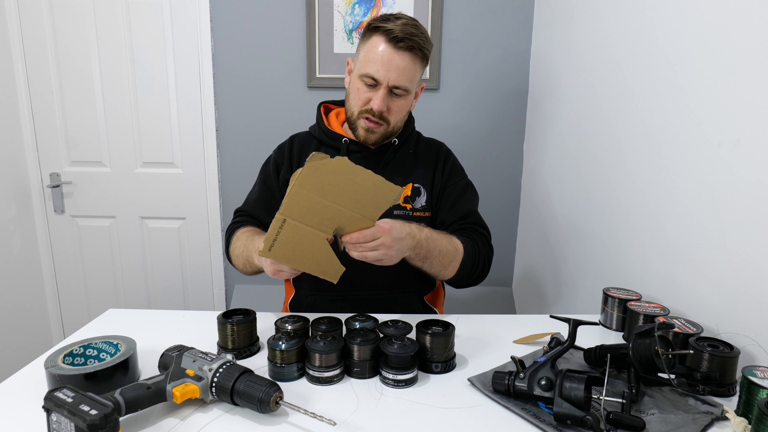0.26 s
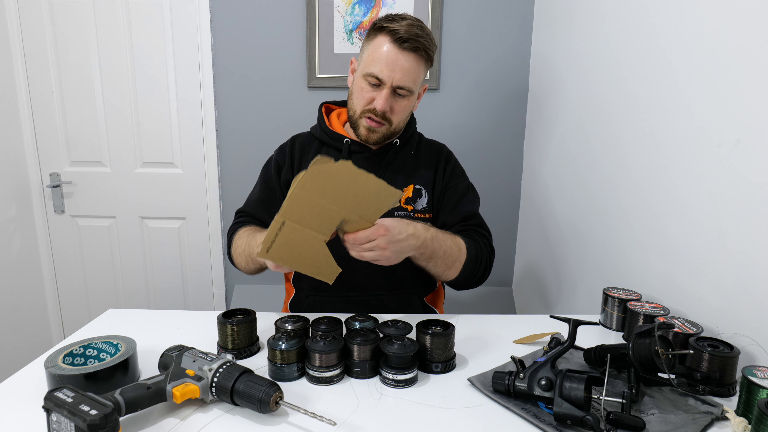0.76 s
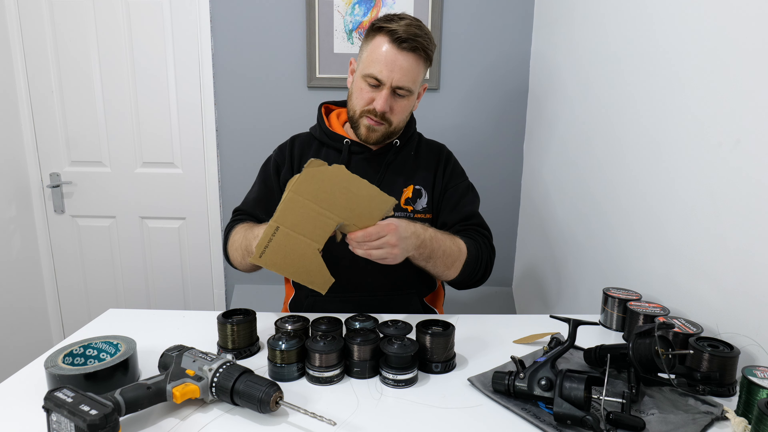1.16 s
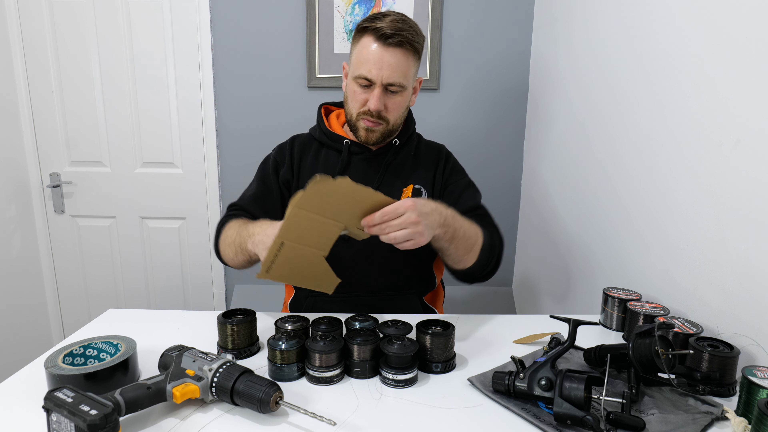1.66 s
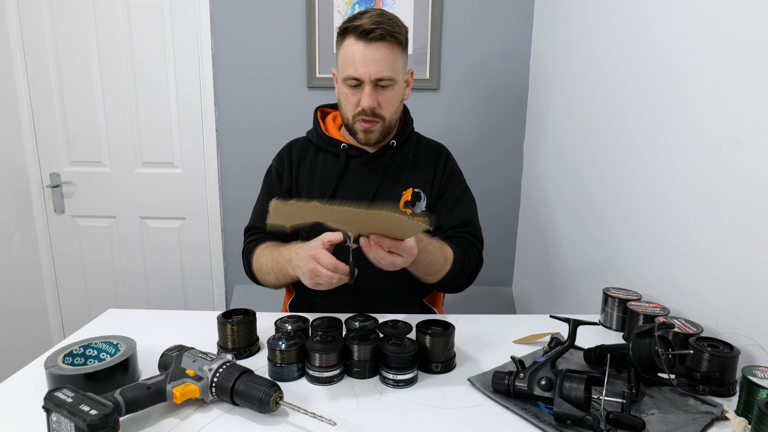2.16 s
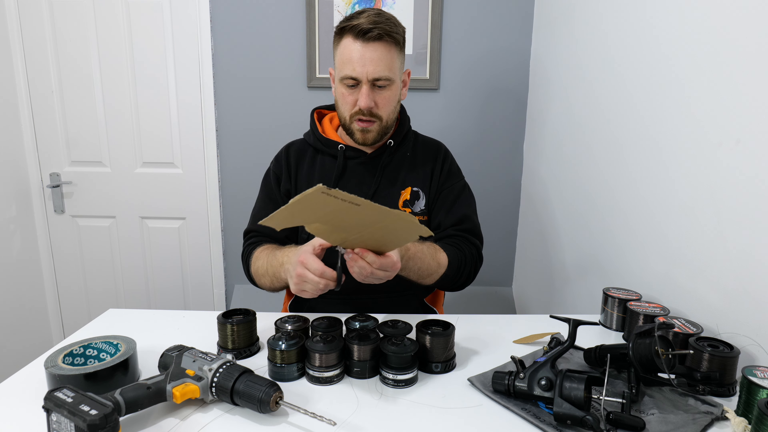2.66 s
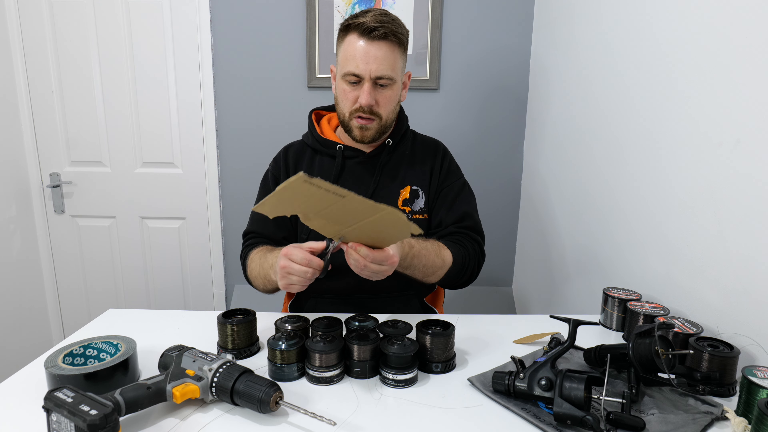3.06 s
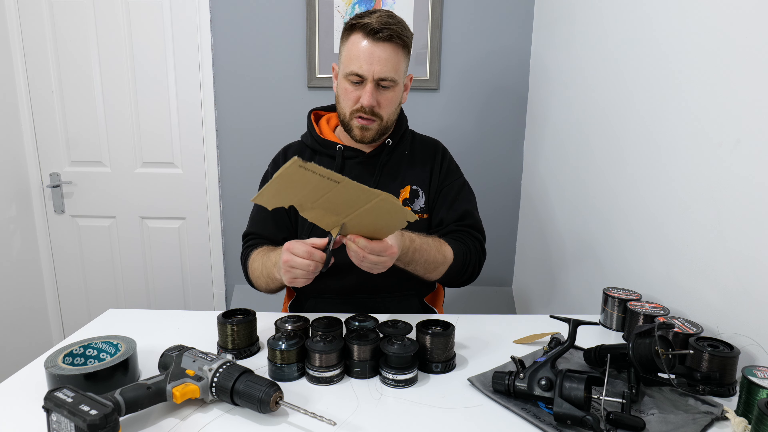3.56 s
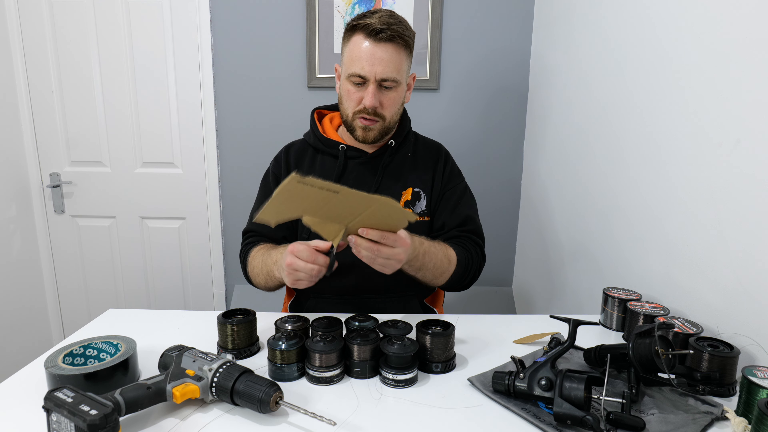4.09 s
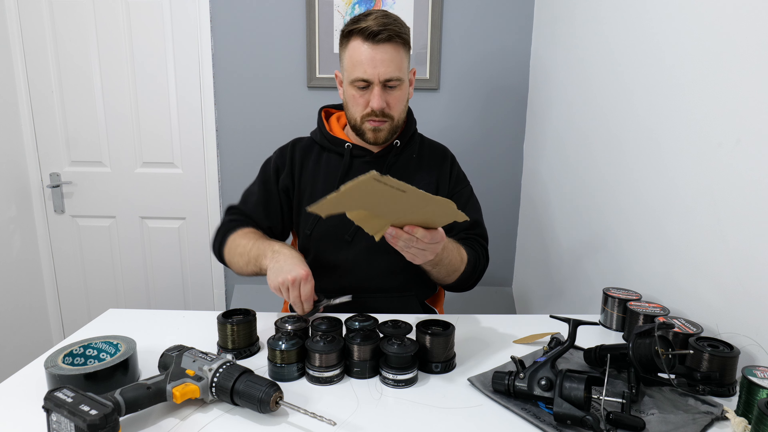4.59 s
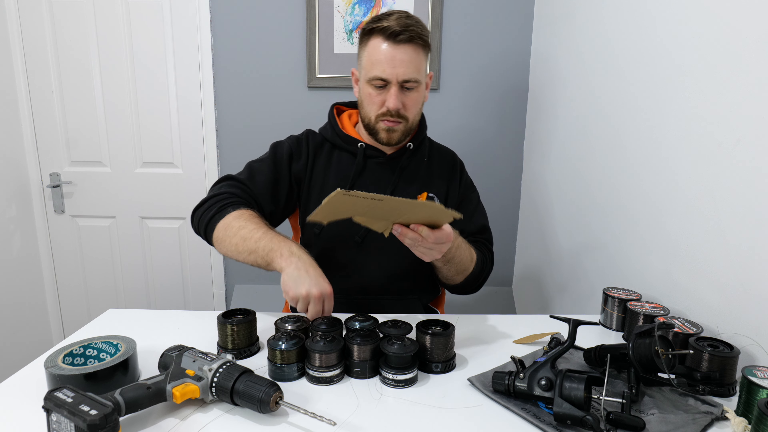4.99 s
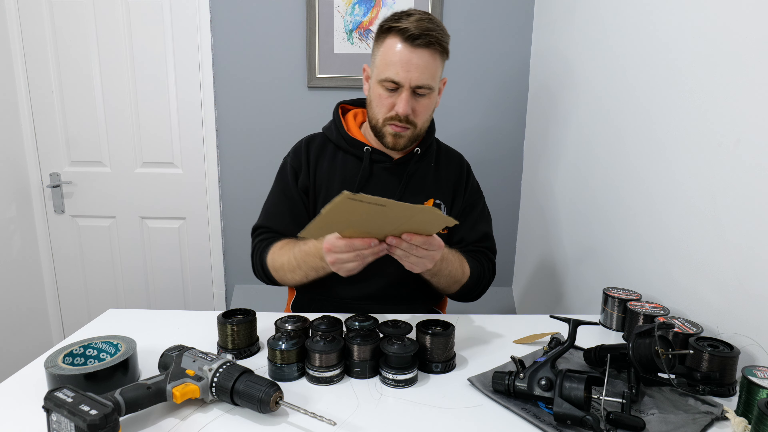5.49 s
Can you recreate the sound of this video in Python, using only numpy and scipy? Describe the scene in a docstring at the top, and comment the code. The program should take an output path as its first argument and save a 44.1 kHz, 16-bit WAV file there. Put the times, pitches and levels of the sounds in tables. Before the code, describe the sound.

Scissors crunch irregularly through stiff corrugated cardboard that rubs and crackles in the hands, then clatter onto a table in a small room.

```python
"""A dry crunch and a papery rub come first: scissors bite through corrugated card held in the hands. Each bite
is a burst of breaking fibres, a bright crunch that also rings and booms the sheet. In between, a changing
rubbing hiss and hum sounds through the same resonances. Near the end the scissors clatter onto the table, which
knocks and thumps while the steel rattles; then a few last bites follow. A small bare room answers all of it,
over a faint room tone."""
import sys
import numpy as np
from scipy import signal
from scipy.fft import rfft, irfft
from scipy.io import wavfile

SR = 44100
rng = np.random.default_rng(int(sys.argv[2]) if len(sys.argv) > 2 else 0)


def unload_wav(signal):
    """Save mono or channel-first audio to the path in sys.argv[1] as 16-bit WAV at rate SR, clipped to [-1, 1]."""
    wavfile.write(
        sys.argv[1],
        SR,
        np.round(np.clip(np.atleast_2d(signal).T, -1, 1) * 32767).astype(np.int16),
    )


N = 252957

# All table levels are relative: each layer is trimmed again where it is mixed.
# Spectrum of the room tone: pitch_hz [Hz], level_db [dB]
ROOM_TONE = [(18, -71), (30, -31), (103, -5.5), (238, -17), (372, -0.5), (735, -7.5), (1420, -7.5),
             (3450, -15.5), (10900, -15.5), (14200, -20), (15800, -39)]
# Time the reverberation takes to fall 60 dB: pitch_hz [Hz], t60_s [s]
REVERB_T60 = [(150, 0.4), (500, 0.4), (1500, 0.27), (4000, 0.39), (10000, 0.27), (15000, 0.18)]
# Width of the reverberation, side against mid: pitch_hz [Hz], side_db [dB]
REVERB_SIDE = [(60, -11), (110, -25), (200, -21), (380, -28.5), (700, -17.5), (1290, -14.5), (2380, -15),
               (4400, -10), (8120, -21.5), (15000, -7)]

# Scissors touching the table: start_s [s], knock_db [dB], knock_hz [Hz, favoured], thump_db [dB],
# steel_db [dB], steel_hz [Hz, favoured], fade_t60_s [s]
TABLE_CONTACTS = [(4.55, -45, 2050, -38.5, -52, 4340, .12), (4.761, -33, 1640, -47.5, -33, 5510, 0.038),
                  (4.837, -31, 1760, -64, -42, 6150, .071), (4.909, -45, 1710, -73, -42.5, 6050, .033),
                  (4.975, -31.5, 1250, -47.5, -45, 5530, 0.36),
                  (5.02, -11.5, 1920, -33.5, -51, 4470, 0.0077),
                  (5.036, -21.5, 1950, -42.5, -48, 4470, 0.16), (5.095, -24.5, 724, -51, -34.5, 5900, .044),
                  (5.145, -1, 2600, -28, -47, 4560, 0.007), (5.159, -9.5, 980, -59, -44, 4500, 0.026),
                  (5.191, -17.5, 1010, -31.5, -23, 8100, 0.048),
                  (5.209, -16, 920, -27.5, -30.5, 7900, 0.056), (5.25, -15.5, 1200, -44, -41, 8210, 0.058),
                  (5.289, -23.5, 1280, -34, -43, 8130, 0.07)]
# Resonances of the table top with handles lying on it: pitch_hz [Hz], width_hz [Hz], level_db [dB]
TABLE_KNOCK_MODES = [(733, 200, 4), (890, 110, 0), (990, 64, -3), (1094, 48, 0.5), (1370, 160, 3.5),
                     (1528, 43, -1.5), (1570, 220, 2.5), (1890, 140, -12), (1986, 230, 3), (2536, 100, -4),
                     (2570, 240, -2), (3100, 250, -7.5), (3600, 300, -8.5), (4400, 300, -2)]
# Low resonances of the table: pitch_hz [Hz], width_hz [Hz], level_db [dB]
TABLE_THUMP_MODES = [(135, 31, 0.5), (165.4, 32, 1.5), (197, 69, -6), (321, 44, 1.5), (368, 120, -0.5),
                     (560, 60, 4.5)]
# Steel damped by hand and table: pitch_hz [Hz], width_hz [Hz], level_db [dB]
DAMPED_BLADE_MODES = [(5440, 370, -16), (5360, 1700, 4), (6800, 750, -16), (8400, 830, -3),
                      (11200, 1500, -6.5), (12500, 1500, -21)]
# Blades ringing freely: pitch_hz [Hz], width_hz [Hz], level_db [dB]
FREE_BLADE_MODES = [(7950, 90, -7), (8340, 70, -2), (8730, 200, -10), (12400, 87, -7), (12430, 80, -12)]

# Bites and snaps of the card: start_s [s], ring_db [dB], ring_hz [Hz, favoured], boom_db [dB],
# crunch_db [dB], snap_db [dB over the burst], fade_t60_s [s]
CARD_BITES = [(0.0301, -30, 2020, -35, -39, -6, 0.28), (0.0701, -28, 1310, -27.5, -36, 26, 0.077),
              (0.185, -29.5, 1220, -35, -52, 18.5, .078), (0.2178, -29.5, 1720, -36.5, -33, 19, 0.16),
              (0.2663, -32, 1470, -27, -37, 19, 0.12), (0.2903, -25.5, 1200, -57, -25.5, 14, 0.28),
              (0.3539, -18, 1940, -24.5, -34, 23, .09), (0.5247, -16.5, 1670, -23, -22, 10.5, 0.026),
              (0.5462, -15, 1180, -30, -39, 19.5, 0.074), (0.613, -27.5, 1980, -42, -36.5, 19, 0.14),
              (0.6977, -23, 1190, -38, -49, 16, 0.24), (0.7381, -21, 1800, -34.5, -29, 19, 0.21),
              (0.7853, -17, 1160, -27.5, -32.5, 22.5, 0.063), (0.821, -24.5, 1570, -39.5, -36, 23, 0.44),
              (0.8934, -17, 1480, -26, -23, 21.5, 0.083), (1.056, -22, 1340, -22, -23.5, 15.5, 0.053),
              (1.1075, -48, 1960, -35, -42, 23.5, 0.2), (1.3666, -45, 1720, -57, -43.5, 23, 0.5),
              (1.4455, -15, 1450, -27, -28, 19.5, 0.17), (1.4862, -23, 1320, -25, -25.5, 18.5, 0.11),
              (1.6642, -30, 1220, -41, -34, 6, 0.046), (1.7921, -24.5, 1330, -27.5, -35, 9.5, 0.033),
              (1.8414, -19.5, 1220, -31, -32.5, 20, .2), (1.8754, -29, 1620, -42, -34, 19, 0.29),
              (2.037, -42, 1390, -38, -37.5, 16.5, 0.028), (2.167, -27.5, 1230, -44.5, -35.5, 12, 0.13),
              (2.2865, -35, 1320, -60, -43, 9, 0.045), (2.3188, -32.5, 1430, -61, -58, 3, 0.094),
              (2.4004, -39.5, 1580, -61, -42.5, 19, .31), (2.6396, -25.5, 1700, -37.5, -35.5, 15, 0.089),
              (2.748, -31.5, 1630, -49.5, -35, 12, 0.093), (2.865, -42, 1400, -53, -39.5, 6, 0.079),
              (2.9178, -33.5, 1250, -53, -38.5, 15, 0.039), (3.0611, -12.5, 2250, -37, -25, 14, 0.033),
              (3.0859, -25, 1830, -40, -25, 28.5, 0.23), (3.269, -30, 1410, -45, -25.5, 6, 0.24),
              (3.4024, -65, 1750, -63, -42, 12, 0.2), (3.45, -36, 1460, -47, -34.5, 24, 0.13),
              (3.481, -18.5, 1877, -33.5, -22.5, 19.5, .25), (3.658, -37, 1250, -60, -30.5, 7, 0.2),
              (3.6974, -29, 2380, -63.5, -44, 22.5, 0.077), (3.7848, -35, 2400, -53, -33.5, 15, 0.14),
              (3.82, -24.5, 1500, -41, -26.5, 19, 0.04), (3.8535, -17.5, 1830, -26, -16.5, 19.5, .12),
              (4.118, -31, 1840, -53, -42, 10, 0.029), (4.3714, -37, 1350, -74, -34.5, 24, 0.082),
              (5.4595, -24.5, 1250, -34, -24.5, 25.5, 0.054), (5.4899, -25.5, 2000, -38, -26, 21, 0.091),
              (5.6367, -12, 1340, -20.5, -17, 19, 0.093)]
# Rubbing hiss and hum, played through the sheet's resonances; near 5 s it is the scissors scraping the table:
# start_s [s], hiss_db [dB], ring_db [dB]
RUBBING = [(0.0, -41, -37.5), (0.19, -64, -45.5), (0.33, -53, -51), (0.49, -54, -40.5), (0.7, -36, -29.5),
           (0.97, -53, -46), (1.09, -39, -28), (1.23, -48.5, -45), (1.48, -71, -62), (1.63, -53.5, -39.5),
           (1.85, -43.5, -41), (2.19, -60, -60.5), (2.32, -40, -34), (2.44, -74, -60), (2.99, -64, -73),
           (3.29, -73, -48.5), (4.05, -52, -47.5), (4.23, -38.5, -34.5), (4.33, -47.5, -49),
           (4.44, -88, -96), (4.6, -78, -92), (4.81, -51, -40), (4.95, -69, -56), (5.06, -55, -35),
           (5.24, -61, -35), (5.37, -50, -41), (5.74, -50, -56)]
# Pitches favoured by how the sheet is held: start_s [s], boom_hz [Hz], rubbed_ring_hz [Hz]
SHEET_GRIP = [(0, 546, 1380), (0.45, 570, 1490), (0.7, 700, 1720), (0.74, 330, 1690), (0.78, 670, 1650),
              (0.9, 554, 1470), (1.05, 440, 1460), (1.5, 547, 1450), (1.8, 350, 1320), (1.85, 670, 1350),
              (2.04, 377, 1450), (2.4, 420, 1710), (3.825, 404, 2220), (3.855, 730, 2230),
              (3.98, 424, 2180), (4.2, 448, 1800), (5.06, 420, 1930), (5.46, 420, 1300), (5.64, 706, 1390)]
# Low resonances of the sheet: pitch_hz [Hz], width_hz [Hz], level_db [dB]
SHEET_BOOM_MODES = [(141.5, 12, -2.5), (203, 450, -15.5), (313, 62, -1.5), (383.6, 25, 0), (445.3, 25, -3),
                    (593, 69, 1.5), (693, 110, -9), (821, 20, 0)]
# Upper resonances of the sheet: pitch_hz [Hz], width_hz [Hz], level_db [dB]
SHEET_RING_MODES = [(964, 105, -6), (1183, 55, -0.5), (1276, 390, -0.5), (1443, 120, -0.5),
                    (1546, 250, -12.5), (1700, 79, -1), (1848, 106, -1), (1934, 630, -4), (2310, 146, 0),
                    (2640, 79, -7.5), (3320, 120, -7), (3180, 660, -6), (4020, 250, -10), (4800, 150, -15)]
# Broad bands in which breaking fibres crunch: pitch_hz [Hz], width_hz [Hz], level_db [dB]
CRUNCH_BANDS = [(2160, 1140, 4), (3200, 610, -2), (4170, 1440, 1), (5700, 1840, -1), (7650, 1400, 0),
                (9260, 1200, 0), (11750, 4400, 4.5), (14500, 2600, -6)]

ROOM_TONE_DB = -64   # level of the part shared by left and right
REVERB_DB, WALL_S, WALL_DB = 2.5, 0.01, -11.5   # diffuse tail and one near wall, against the direct sound
POSE_S = 0.14   # spacing of the hands' places in the room
SNAP_SPREAD_S = 0.002   # longest random delay of a snap
CLUMPS_PER_S, CLUMP_DEPTH_DB = 160, 3.0
TREBLE_SNAP_DB = -5   # snaps are blunt, little of them reaches the treble
KNOCK_SNAP_DB, HARD_THUMP_HZ, SOFT_THUMP_HZ = 15.5, 315, 191
CRUNCH_HZ = 5300   # centre of the crunch
# Swell and climb of a bite with a 0 dB snap; both halve with every 10 dB of snap, so hard bites are sudden
TEAR_SWELL_S, TEAR_CLIMB_S, HALVING_DB = 0.072, 0.021, 10
CUTOFF_HZ = 16300   # stopband edge of the final low-pass


def amp(db):
    """Decibels to a linear gain."""
    return 10 ** (np.asarray(db) / 20)


def rms_one(x):
    """Scale to an rms of 1."""
    return x / np.sqrt(np.mean(x ** 2) + 1e-20)


def at_hz(points, hz):
    """Read a curve at a pitch, straight between its points on a log pitch axis."""
    pitch_hz, value = np.array(points).T
    return np.interp(np.log(hz), np.log(pitch_hz), value)


def over_time(start_s, values):
    """Glide in straight lines between timed values, one value per sample."""
    return np.interp(np.arange(N) / SR, start_s, values)


def coloured(x, spectrum):
    """Shape by a (Hz, dB) spectrum; white input of rms 1 comes out at rms 1."""
    gain = amp(at_hz(spectrum, np.arange(1, N // 2 + 2) * SR / N))
    return irfft(rfft(x) * rms_one(gain), N)


def passed(x, hz, kind):
    """Low-, high- or band-pass from a Butterworth design of order 2."""
    return signal.sosfilt(signal.butter(2, hz, kind, fs=SR, output="sos"), x)


def resonate(x, hz, width_hz):
    """Two-pole resonance scaled so that white noise keeps its rms."""
    r = np.exp(-np.pi * width_hz / SR)
    feed = np.sqrt((1 - r * r) / 2) * np.array([1, 0, -1])
    feedback = [1, -2 * r * np.cos(2 * np.pi * hz / SR), r * r]
    return signal.lfilter(feed, feedback, x + 1e-18)


def room_tone():
    """Faint coloured noise, mostly shared by left and right with some of its own on each side."""
    white = rng.standard_normal((3, N))
    return amp(ROOM_TONE_DB) * coloured(white[0] + 0.5 * white[1:], ROOM_TONE)


def reflections():
    """Direct sound, one near wall, then a diffuse tail that dies band by band, partly unlike left and right."""
    t = np.arange(SR // 2) / SR
    edges = np.geomspace(60, 18000, 13)
    tail = np.zeros((2, len(t)))
    white = rng.standard_normal((2, 2, len(t)))   # neighbouring bands take different noise
    for k, (low, high) in enumerate(zip(edges, edges[1:])):
        hz = np.sqrt(low * high)
        mid, side = passed(white[k % 2], [low, high], "band")
        side = side * amp(at_hz(REVERB_SIDE, hz) + 8) * [[1], [-1]]
        tail += (mid + side) * amp(-60 * t / at_hz(REVERB_T60, hz))
    tail *= np.minimum(t / 0.0023, 1)   # the diffuse tail takes a moment to build
    tail *= amp(REVERB_DB) / np.sqrt(np.sum(tail ** 2) / 2)
    tail[:, 0] += 1
    tail[:, round(WALL_S * SR)] += amp(WALL_DB)
    return tail


def room(x):
    """The hands keep moving, so one pose fades into the next and sends its sound along other paths."""
    step = round(POSE_S * SR)
    out = np.zeros((2, N + 2 * SR))
    padded = np.pad(x, (step, 2 * step))
    blend = np.sin(np.pi * np.arange(2 * step) / (2 * step)) ** 2
    for i in range(0, N + step, step):
        pose = blend * padded[i:i + 2 * step]
        wet = signal.fftconvolve(pose[None], reflections(), axes=1)
        out[:, i:i + wet.shape[1]] += wet
    return out[:, step:N + step]


def fibres(per_s, spread_db):
    """Tiny breaks at random moments, mostly small, now and then large; rms 1."""
    sizes = amp(spread_db * np.minimum(rng.exponential(1, N), 3)) * rng.standard_normal(N)
    return rms_one(sizes * (rng.random(N) < per_s / SR))


def flurries(per_s, depth_db):
    """Breaks come in clumps: a quickly wavering gain shared by all modes of a body."""
    steps = rng.standard_normal(round(N / SR * per_s) + 2)
    wander = np.interp(np.arange(N) / SR * per_s, np.arange(len(steps)), steps)
    return rms_one(amp(depth_db * wander))


def envelopes(swells_s, climbs_s, fades_s):
    """One row per burst, starting 0.1 s ahead: swell to the onset, climb to full, die away."""
    t = np.arange(-(SR // 10), SR // 4) / SR
    swell, climb, fade = np.clip([swells_s, climbs_s, fades_s], 5e-4, 0.6)[..., None]
    rise_db = -30 * np.maximum(-t, 0) / swell - 7 * np.clip(1 - t / climb, 0, 1)
    return amp(rise_db - 60 * np.maximum(t - climb, 0) / fade)


def bursts(onsets, levels_db, snaps_db, shapes, grain):
    """Grain under the envelopes, and one snap per onset, which takes a moment to run through the body."""
    swell, snap = np.zeros(N + SR), np.zeros(N)
    at = np.round(onsets * SR).astype(int)
    for i, level_db, shape in zip(at, levels_db, shapes):
        swell[i:i + len(shape)] += amp(level_db) * shape
    late = (rng.random(len(at)) * SNAP_SPREAD_S * SR).astype(int)
    snap[at + late] = amp(levels_db + snaps_db) * rng.choice([-1, 1], len(at))
    return swell[SR // 10:][:N] * grain + snap   # drop the 0.1 s lead of the envelopes


def body(modes, levels_db, favoured_hz, timing, reach_db, per_s, spread_db, snap_trim_db,
         rub_db=-200, rub_hz=1):
    """Bursts and rubbing drive all modes, losing reach_db per octave away from the favoured pitch."""
    out = np.zeros(N)
    onsets, snaps_db, shapes = timing
    clumps = flurries(CLUMPS_PER_S, CLUMP_DEPTH_DB)
    for hz, width_hz, mode_db in modes:
        grain = clumps * fibres(per_s, spread_db)
        burst_db = levels_db - reach_db * np.abs(np.log2(hz / favoured_hz))
        drive = bursts(onsets, burst_db, snaps_db + snap_trim_db, shapes, grain)
        drive += amp(rub_db - reach_db * np.abs(np.log2(hz / rub_hz))) * grain
        out += amp(mode_db) * resonate(drive, hz, width_hz)
    return out


def scissors_on_table():
    """Short hard contacts: the table top knocks and thumps, the steel rattles."""
    start_s, knock_db, knock_hz, thump_db, steel_db, steel_hz, fade_s = np.transpose(TABLE_CONTACTS)
    # a soft landing reaches only the low modes
    thump_hz = np.where(thump_db > knock_db, SOFT_THUMP_HZ, HARD_THUMP_HZ)
    shapes = envelopes(np.full(len(start_s), 0.004), np.full(len(start_s), 0.002), fade_s)
    timing = start_s, KNOCK_SNAP_DB, shapes
    knock = body(TABLE_KNOCK_MODES, knock_db - 11, knock_hz, timing,
                 reach_db=12.5, per_s=1400, spread_db=2.0, snap_trim_db=7.0)
    thump = body(TABLE_THUMP_MODES, thump_db - 3.5, thump_hz, timing,
                 reach_db=9.5, per_s=1000, spread_db=4.5, snap_trim_db=3.5)
    rattle = body(DAMPED_BLADE_MODES, steel_db - 9, steel_hz, timing,
                  reach_db=0.5, per_s=20000, spread_db=5.0, snap_trim_db=TREBLE_SNAP_DB)
    # the blades ring freely only when they bounce clear, which is when the rattle sits on their own pitch
    free_db = steel_db - 3.5 - 70 * np.abs(np.log2(steel_hz / 8150))
    ring = body(FREE_BLADE_MODES, free_db, steel_hz, timing,
                reach_db=8, per_s=5400, spread_db=4.0, snap_trim_db=5.5)
    table = passed(knock, [400, 4500], "band") + passed(thump, [140, 800], "band")
    return table + passed(rattle + ring, 3700, "high")


def card():
    """Cutting and handling: breaking fibres crunch, and with the rubbing they ring and boom the sheet."""
    start_s, ring_db, ring_hz, boom_db, crunch_db, snap_db, fade_s = np.transpose(CARD_BITES)
    rub_s, hiss_db, hum_db = np.transpose(RUBBING)
    hiss_db, hum_db = over_time(rub_s, hiss_db), over_time(rub_s, hum_db)
    grip_s, grip_boom_hz, grip_ring_hz = np.transpose(SHEET_GRIP)
    bite_boom_hz = np.interp(start_s, grip_s, grip_boom_hz)
    slowness = 0.5 ** (snap_db / HALVING_DB)
    timing = start_s, snap_db, envelopes(TEAR_SWELL_S * slowness, TEAR_CLIMB_S * slowness, fade_s)
    crunch = body(CRUNCH_BANDS, crunch_db - 11.5, CRUNCH_HZ, timing,
                  reach_db=2.5, per_s=8000, spread_db=4.5, snap_trim_db=TREBLE_SNAP_DB,
                  rub_db=hiss_db - 10, rub_hz=6800)
    ring = body(SHEET_RING_MODES, ring_db - 14.5, ring_hz, timing,
                reach_db=16, per_s=700, spread_db=4.5, snap_trim_db=5,
                rub_db=hum_db - 12, rub_hz=over_time(grip_s, grip_ring_hz))
    boom = body(SHEET_BOOM_MODES, boom_db - 8, bite_boom_hz, timing,
                reach_db=13, per_s=500, spread_db=5.0, snap_trim_db=5.5,
                rub_db=hum_db - 19.5, rub_hz=over_time(grip_s, grip_boom_hz))
    # a thin sheet hardly radiates bass, and its bending dies out in the treble
    sheet = passed(ring, [500, 6000], "band") + passed(boom, [120, 1500], "band")
    return passed(crunch, 870, "high") + sheet


def scene():
    """Card and scissors in the room, over a faint room tone."""
    return room_tone() + amp(-2.5) * room(card() + scissors_on_table())


def record(dry):
    """The bass is rolled off, the highest peaks are rounded and the top is cut."""
    thin = signal.sosfilt(signal.butter(1, 40, "high", fs=SR, output="sos"), dry)
    rounded = 2 * np.tanh(thin / 2)
    return signal.sosfilt(signal.cheby2(14, 75, CUTOFF_HZ, fs=SR, output="sos"), rounded)


dry = scene()
out = record(dry)
unload_wav(out)
```